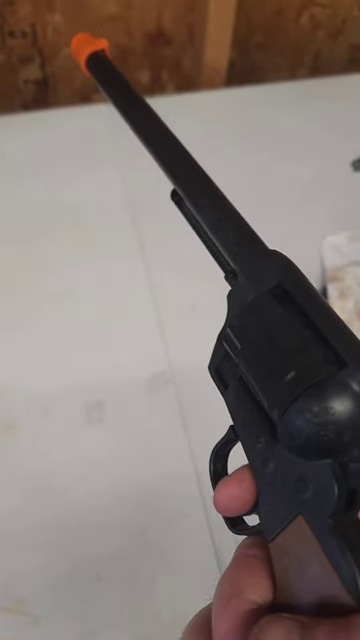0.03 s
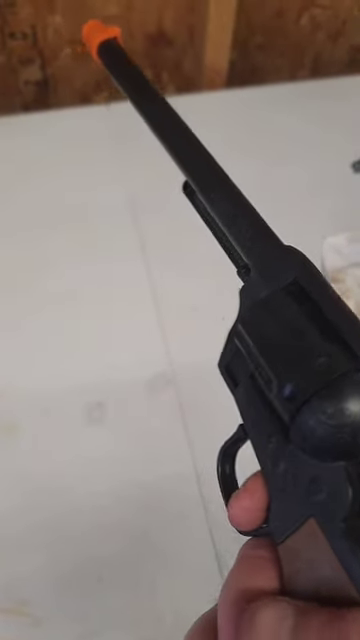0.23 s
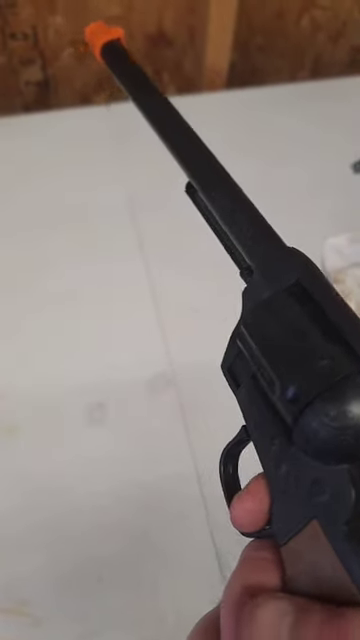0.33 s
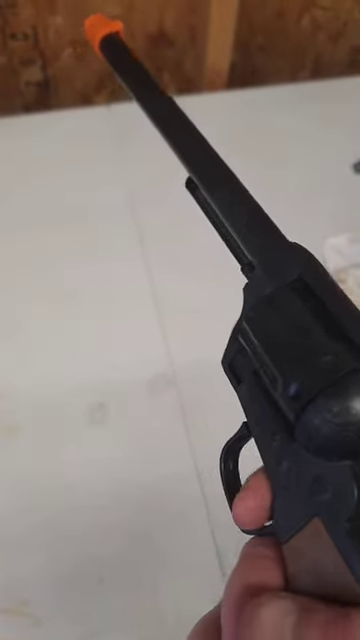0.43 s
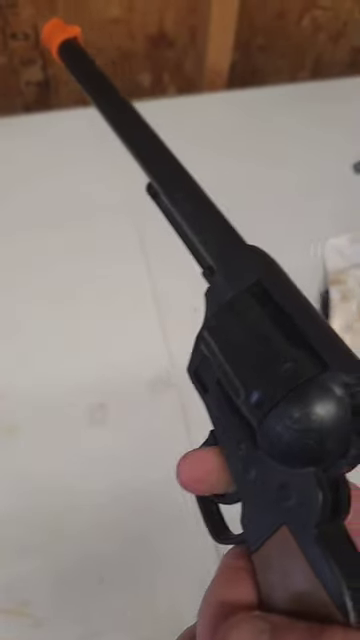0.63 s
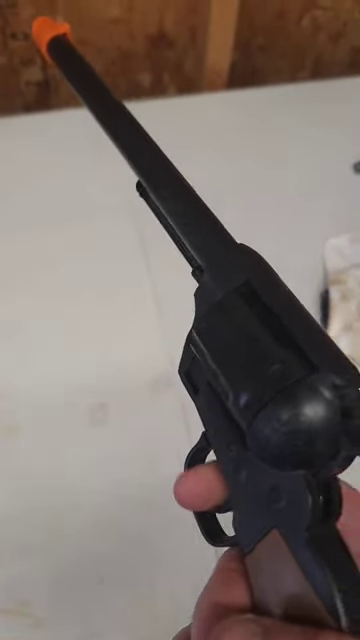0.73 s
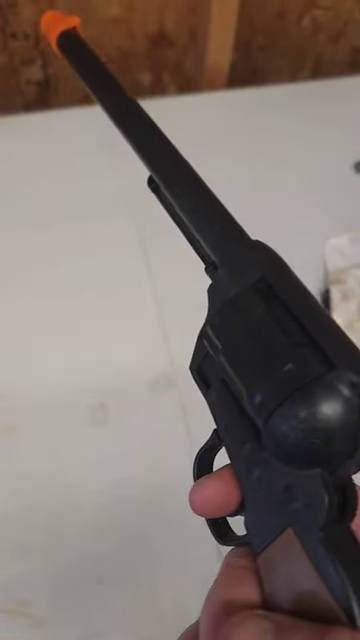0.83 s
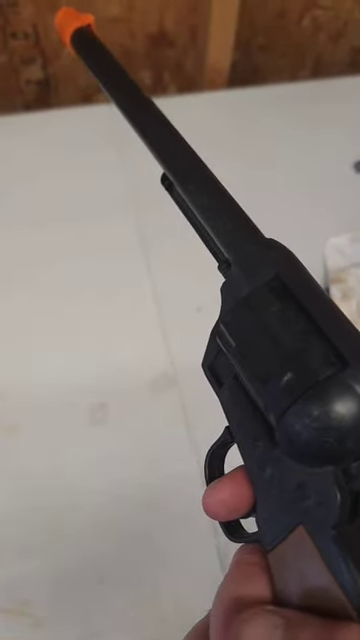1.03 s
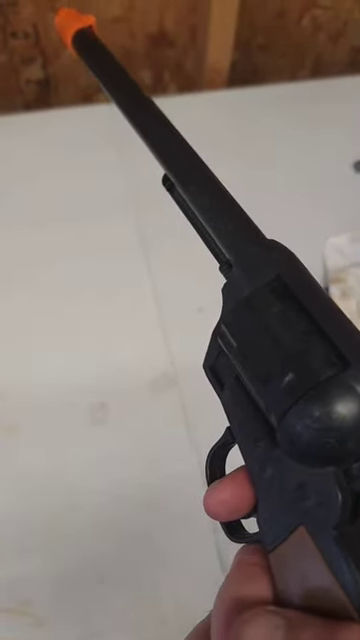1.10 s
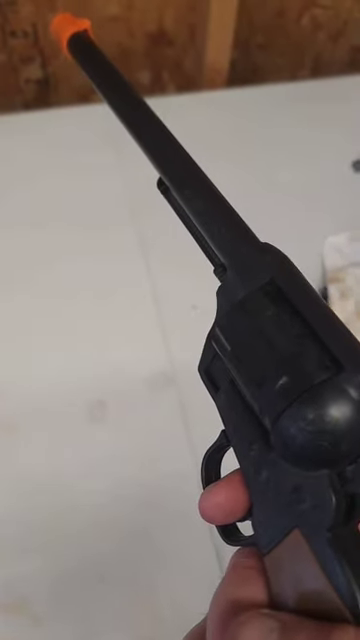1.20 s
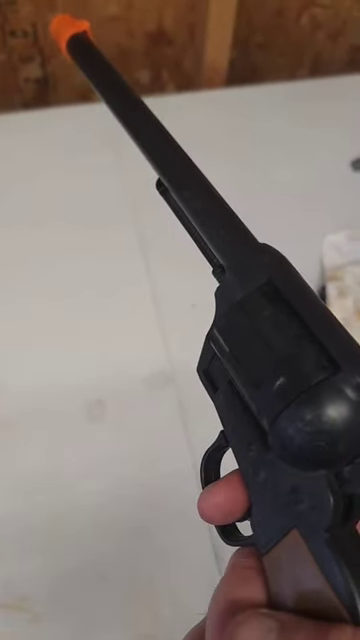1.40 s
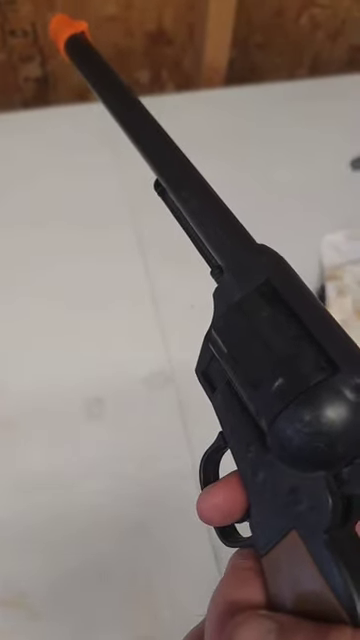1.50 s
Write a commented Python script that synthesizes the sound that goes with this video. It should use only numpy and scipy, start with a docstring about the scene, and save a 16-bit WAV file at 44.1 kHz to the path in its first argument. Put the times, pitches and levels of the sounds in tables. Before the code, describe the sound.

Toy revolver's trigger and hammer worked by hand, sharp hollow clicks and snaps in a quiet room

```python
"""A toy cap revolver without caps is worked by hand, close to a phone in a small quiet room.
The hand rustles on the grip over rumble and hum; trigger and pawl tick, amid short noise swells.
The hammer snaps down at 0.4 s and 0.7 s, then the catches click back at about 1.2 s.
Every contact is a noise crack plus decaying sines, the ring of the same hollow body and steel parts.
A decaying noise tail answers each contact and swell as the room."""
import sys
import numpy as np
from scipy import signal
from scipy.fft import rfft, irfft, next_fast_len
from scipy.io import wavfile
from scipy.ndimage import uniform_filter1d

SR = 44100
rng = np.random.default_rng(int(sys.argv[2]) if len(sys.argv) > 2 else 0)


def generate_wav(sig):
    """Save sig (samples, or channels by samples) to the path in sys.argv[1] as 16-bit PCM at SR."""
    pcm = np.round(np.clip(np.atleast_2d(sig).T, -1, 1) * 32767).astype(np.int16)
    wavfile.write(sys.argv[1], SR, pcm)


N = 68355  # length in samples


def undb(db):
    """Decibels to gain."""
    return 10 ** (np.asarray(db) / 20)


def unit(x):
    """Scale to rms 1."""
    return x / np.sqrt(np.mean(x ** 2) + 1e-20)


def decay(t, t60_s):
    """Exponential fade that falls 60 dB in t60_s."""
    return np.exp(-np.log(1000) * t / t60_s)


def shape(x, db_at):
    """Causal minimum-phase filter whose gain in dB is a function of frequency."""
    n = 2 * next_fast_len(x.shape[-1])
    hz = np.arange(n // 2 + 1) * SR / n + 1  # 1 Hz up, to stay clear of zero
    cepstrum = irfft(np.log(undb(db_at(hz))))
    # fold the cepstrum forward in time, so nothing sounds early
    cepstrum[1:n // 2] *= 2
    cepstrum[n // 2 + 1:] = 0
    response = np.exp(rfft(cepstrum))
    return irfft(rfft(x, n) * response)[..., :x.shape[-1]]


def colour(x, points):
    """Filter through (pitch_hz, gain_db) points, joined on a log frequency scale."""
    hz, db = np.array(points).T
    return shape(x, lambda f: np.interp(np.log(f), np.log(hz), db))


LIKENESS = 0.3  # share of power common to left and right


def pair(three):
    """One shared and two separate signals make a partly alike left and right."""
    return np.sqrt(LIKENESS) * three[0] + np.sqrt(1 - LIKENESS) * three[1:]


def add(out, x, start_s):
    """Mix x into out from a given time."""
    i = int(start_s * SR)
    out[:, i:i + x.shape[1]] += x[:, :N - i]


# Contacts in the lock: start_s, level_db, thud_db, clack_db, treble_db, left_minus_right_db,
# crack_decay_ms, room_send_db
LOCK_CONTACTS = [ (0.1663, -37, 1, 7.5, -10, -3, 1.6, 0), (0.1879, -23, 0, 1, 3, 9, 1.4, 7),
                 (.2000, -16, -16, 6.5, -5.5, 0, 3.4, -7), (0.2057, -14, -7.5, 3.5, 2, 4.5, 1.1, -26),
                 (0.2129, -12, -7.5, 2, -4.5, 0, 1.3, -21), (0.243, -43.5, 8, 0.5, -18, -26, 1.5, -5),
                 (.2612, -34.5, 9.5, -1.5, -10, -26, 1.8, 1.5), (0.2685, -20, -2, 8, -6.5, 6, 2.1, -3),
                 (0.3104, -18.5, 7.5, -1.5, -6.5, 3, 0.99, 0), (.3195, -37.5, 8, 1.5, -7, -1.5, .8, -8),
                 (0.3226, -26.5, -6, -2, 3, 6, .8, 9), (0.337, -9, 1.5, 8.5, -1, 1.5, 1.3, -9.5),
                 (0.3746, -32, -11, -5, 9.5, 5.5, .9, 4), (0.4029, -2, 0.5, -3, 3.5, -3.5, 1.3, -6),
                 (.4090, -3, -4, -1, 0, -1, 1.3, 5.5), (0.543, -35.5, 12.5, 3, -15, -6.5, 1.5, -5.5),
                 (.6460, -29.5, -25.5, -4.5, -10.5, 6, 1.5, 1),
                 (.6715, -39, 15, -2.5, -11.5, 1.5, 4.4, 13.5), (.6930, -30.5, -15, 1, -4, 9, 1.5, -1.5),
                 (0.7135, -5, 0, -6.5, -2.5, 1, .8, -3.5), (0.7156, -4, -14.5, -1.5, 4, 1, 1.0, -2.5),
                 (0.8587, -19, 1.5, 4.5, -6.5, 3, 1.4, -6.5), (0.9427, -39.5, -5.5, -5, -2, 3, 1.0, -4),
                 (0.9597, -42, 1.5, -1, -11, 0.5, 2.55, -5), (1.0341, -58, -18, 9, 9, 1, 0.81, 3),
                 (1.2034, -16.5, -12.5, 4, 0.5, 0, 2.4, -14.5), (1.2144, -22, -3.5, 2, -6.5, 5, 1.8, -9)]


def lock_contacts():
    """Parts of the lock strike one after another; returns the direct sound and the room send."""
    direct, sent = np.zeros((2, N)), np.zeros((2, N))
    for start_s, level_db, thud_db, clack_db, treble_db, pan_db, crack_ms, room_db in LOCK_CONTACTS:
        sound = click(level_db, thud_db, clack_db, treble_db, crack_ms)
        balance = undb(np.array([[pan_db], [-pan_db]]) / 2)
        add(direct, sound * balance, start_s)
        add(sent, sound * undb(room_db), start_s)
    return direct, sent


# ranges that each contact drives in its own measure
THUD_HZ, CLACK_HZ, CLACK_WIDTH_HZ, TREBLE_HZ = 950, 2200, 490, 6500


def click(level_db, thud_db, clack_db, treble_db, crack_ms):
    """One contact: a crack and ring under one soft attack, tilted by how the parts meet."""
    t = np.arange(SR // 8) / SR
    rise = 1 - np.exp(-1000 * t / 0.48)  # attack time constant 0.48 ms
    sound = crack(t, rise, level_db, crack_ms) + ring(t) * rise

    def tilt(f):
        thud = thud_db / (1 + (f / THUD_HZ) ** 6)
        clack = clack_db * np.exp(-((f - CLACK_HZ) / CLACK_WIDTH_HZ) ** 2)
        treble = treble_db / (1 + (TREBLE_HZ / f) ** 4)
        return thud + clack + treble
    return shape(undb(level_db) * sound, tilt)


# Colour of the crack, the body's dense brief modes: pitch_hz, gain_db
CRACK_COLOUR = [(100, -31), (400, -18.5), (750, -1.5), (1100, 1.5), (1600, 0.5), (2300, 6), (3100, 2),
                (4600, 6), (6300, -0.5), (8000, 1.5), (10300, -2), (12500, 5.5), (15000, -5.5),
                (16500, -19)]
CRACK_DB = -7.5
SHELL_DB, SHELL_DECAY_MS = -11.5, 8.1  # against the crack's own fade
SHELL_PER_DB = -0.04  # softer contacts rattle slightly more against their crack


def crack(t, rise, level_db, crack_ms):
    """The strike excites dense brief modes as a noise burst, with a longer rattle of the shell."""
    ms = 1000 * t
    shell = undb(SHELL_DB + SHELL_PER_DB * level_db) * np.exp(-ms / SHELL_DECAY_MS)
    fade = np.exp(-ms / crack_ms) + shell
    burst = pair(rng.standard_normal((3, len(t)))) * fade * rise
    evened = np.array([even(side) for side in burst])
    return undb(CRACK_DB) * colour(evened, CRACK_COLOUR)


EVEN_HZ = 308  # width over which the crack's noise is even


def even(x):
    """Level out the chance bumps in a noise burst's spectrum."""
    def correction(f):
        power = abs(rfft(x, 2 * (len(f) - 1))) ** 2
        smooth = uniform_filter1d(power, max(1, int(EVEN_HZ / (f[1] - f[0]))))
        return -10 * np.log10(smooth / smooth.mean() + 1e-9)
    return shape(x, correction)


# Modes of the hollow body, before detune and scatter: pitch_hz, level_db, t60_s
BODY_MODES = [(742.5, -7.5, 0.041), (974, -9, 0.015), (1053, -4.5, .025), (1223, -2.5, 0.051),
              (1269, -2, .04), (1550, -8, .025), (2082, -2, .022), (2254, -1, 0.032), (2360, -4.5, .016),
              (3860, 1, 0.014), (4430, -7, 0.014), (4908, -2, 0.021), (7430, -3.5, 0.03),
              (12200, -2.5, 0.0023)]
# Thin ring of the steel spring and pawl, before detune and scatter: pitch_hz, level_db, t60_s
STEEL_MODES = [(4120, -15, .05), (6060, -12, 0.025), (5560, -22.5, 0.013), (8195, -15.5, 0.056),
               (9430, -16, 0.013), (10600, -8, 0.039), (13450, -8.5, .03), (13770, -15.5, 0.023),
               (14960, -14.5, .035)]
RING_DB = -21.5
SCATTER_DB, DETUNE = 4.5, 0.013  # chance spread of each mode's level and pitch (fraction)
MODE_SKEW_RAD = 1.13  # spread of a mode's phase between the microphones


def ring(t):
    """Body and steel ring on as decaying sines, driven a little differently by each contact."""
    total = 0
    for hz, db, t60_s in BODY_MODES + STEEL_MODES:
        pitch, size = rng.standard_normal(2)
        phases = 2 * np.pi * rng.random() + MODE_SKEW_RAD * rng.standard_normal((2, 1))
        wave = np.sin(2 * np.pi * hz * (1 + DETUNE * pitch) * t + phases)
        total = total + wave * undb(db + SCATTER_DB * size) * decay(t, t60_s)
    return undb(RING_DB) * total


# Short noise swells, some leading into a snap: start_s, length_s, level_db (before swell and colour)
NOISE_SWELLS = [(0.2, .02, -39.5), (0.232, 0.04, -62), (0.332, 0.013, -26), (0.385, .017, -27),
                (0.692, 0.024, -35.5), (1.192, 0.0098, -40), (1.201, .012, -34)]


def noise_swells(direct, sent):
    """Mix each swell equally into the direct sound and the room send."""
    for start_s, length_s, level_db in NOISE_SWELLS:
        sound = undb(level_db) * noise_swell(length_s)
        add(direct, sound, start_s)
        add(sent, sound, start_s)


# Colour of the noise swells: pitch_hz, gain_db
SWELL_COLOUR = [(200, -26), (700, -5.5), (1200, -4), (1600, 0), (2100, 8.5), (3100, 0), (4600, -1),
                (6300, -3), (8000, -0.5), (11000, -7.5), (15000, -12.5), (16500, -26.5)]
TICKS_PER_S, TICK_SPREAD_DB = 22000, 1


def noise_swell(length_s):
    """A dense run of tiny random ticks grows evenly, then stops short."""
    n = SR // 16
    t = np.arange(n) / SR
    sounding = rng.random(n) < TICKS_PER_S / SR
    ticks = sounding * undb(TICK_SPREAD_DB * rng.standard_normal(n))
    swell = t / length_s * (t < length_s)
    grains = unit(ticks * pair(rng.standard_normal((3, n))))
    return colour(grains * swell, SWELL_COLOUR)


# Room answer: pitch_hz, gain_db
ROOM_COLOUR = [(150, -14.5), (600, -1), (1200, -8.5), (2500, -1), (4200, -1), (8000, -2.5), (13000, -4),
               (16000, -7.5)]
ROOM_DB, ROOM_BUILD_MS = -7.5, 16
ROOM_T60_S, ROOM_TREBLE_T60_S, ROOM_SPLIT_HZ = 0.3, 0.22, 5500


def room(x):
    """Diffuse reflections build quickly and die away, the treble faster."""
    t = np.arange(SR // 2) / SR
    noise = rng.standard_normal((2, len(t)))
    split = signal.butter(2, ROOM_SPLIT_HZ, fs=SR, output="sos")
    low = signal.sosfiltfilt(split, noise)
    treble = noise - low
    tail = low * decay(t, ROOM_T60_S) + treble * decay(t, ROOM_TREBLE_T60_S)
    tail = tail * (1 - np.exp(-1000 * t / ROOM_BUILD_MS))
    answer = colour(unit(tail) / np.sqrt(len(t)), ROOM_COLOUR)
    return undb(ROOM_DB) * signal.fftconvolve(x, answer, axes=1)[:, :N]


# Side against mid at the microphones: pitch_hz, side_minus_mid_db
STEREO_WIDTH = [(150, -11), (600, -1), (1200, 0), (2500, 3.5), (5000, 2), (10000, 0.5)]
# How the two microphones differ toward the gun: pitch_hz, left_minus_right_db
MIC_PORTS = [(400, -0.5), (750, -3), (1200, -6.5), (2200, 3), (5000, 2.5), (9500, 6.5), (12600, -3.5),
             (15000, -6)]


def microphones(x):
    """The spaced microphones agree in the bass and differ in the treble; each has its own colour."""
    mid = colour((x[0] + x[1]) / 2, [(hz, -db / 2) for hz, db in STEREO_WIDTH])
    side = colour((x[0] - x[1]) / 2, [(hz, db / 2) for hz, db in STEREO_WIDTH])
    channels = []
    for sign in (1, -1):  # left, right
        port = [(hz, sign * db / 2) for hz, db in MIC_PORTS]
        channels.append(colour(mid + sign * side, port))
    return np.array(channels)


# Rustle of the hand on the grip: pitch_hz, gain_db
GRIP_COLOUR = [(60, -11.5), (180, -2), (450, -2), (900, -13.5), (1600, -13), (3000, -25.5), (6000, -37),
               (12000, -61.5)]
GRIP_DB, GRIP_HOLD_S, GRIP_SETTLE_S = -55, 0.31, 0.24  # settle is a time constant


def grip():
    """Soft noise rustle of the hand, steady while it squeezes the trigger, then fading."""
    rustle = unit(colour(pair(rng.standard_normal((3, N))), GRIP_COLOUR))
    since_hold_s = np.maximum(np.arange(N) / SR - GRIP_HOLD_S, 0)
    return undb(GRIP_DB) * rustle * np.exp(-since_hold_s / GRIP_SETTLE_S)


HANDLING_DB, HANDLING_FADE_DB_PER_S, HANDLING_HZ = -43.5, 19.5, 41


def handling(t):
    """Low rumble of handling, a narrow band of noise that settles steadily."""
    edges_hz = [HANDLING_HZ / 2, HANDLING_HZ * 1.5]
    band = signal.butter(2, edges_hz, "bandpass", fs=SR, output="sos")
    rumble = unit(signal.sosfilt(band, rng.standard_normal(N)))
    return rumble * undb(HANDLING_DB - HANDLING_FADE_DB_PER_S * t)


# Steady tones, low hum to faint whine: pitch_hz, level_db (rms)
HUM_TONES = [(30, -57.5), (97, -59.5), (120, -64), (344, -83), (388, -72.5), (4974, -86.5)]


def hum(t):
    """Steady sines, each at a chance phase."""
    total = 0
    for hz, db in HUM_TONES:
        total = total + np.sqrt(2) * undb(db) * np.sin(2 * np.pi * (hz * t + rng.random()))
    return total


# Spectrum of the room's noise floor: pitch_hz, density_db (per Hz, relative)
FLOOR_COLOUR = [(20, -2), (45, -4.5), (70, -6.5), (105, -8.5), (145, -20.5), (200, -16), (400, -21.5),
                (660, -22.5), (1000, -32), (1570, -28.5), (2500, -40.5), (3700, -47.5), (5000, -50),
                (5800, -60.5), (8200, -58), (9800, -68.5), (14000, -67), (16000, -79)]
FLOOR_DB, FLOOR_WIDE_HZ = -54, 450  # the floor narrows toward mono below FLOOR_WIDE_HZ


def room_floor():
    """Room rumble and air: coloured noise, nearly mono in the bass and wide above."""
    mid, side = unit(colour(rng.standard_normal((2, N)), FLOOR_COLOUR))
    side = shape(side, lambda f: 20 * np.log10(f / (f + FLOOR_WIDE_HZ)))
    return undb(FLOOR_DB) * (mid + side * np.array([[1], [-1]]))


def background():
    """Room floor and hum, with the handling rumble over them."""
    t = np.arange(N) / SR
    return room_floor() + hum(t) + handling(t)


def scene():
    """The gun's clicks, the noise swells, their reflections, the hand and the background."""
    direct, sent = lock_contacts()
    noise_swells(direct, sent)
    return microphones(direct + room(sent)) + grip() + background()


CEILING, TOP_HZ = 0.85, 16000  # peaks round off toward CEILING (full scale 1)


def record(dry):
    """The phone rounds the hardest snaps and cuts the top."""
    rounded = CEILING * np.tanh(dry / CEILING)
    low_pass = signal.ellip(8, .2, 70, TOP_HZ, fs=SR, output="sos")
    return signal.sosfilt(low_pass, rounded)


dry = scene()
out = record(dry)
generate_wav(out)
```